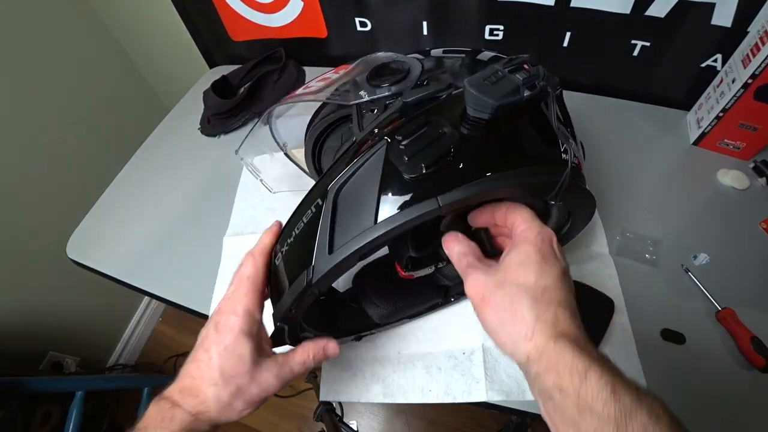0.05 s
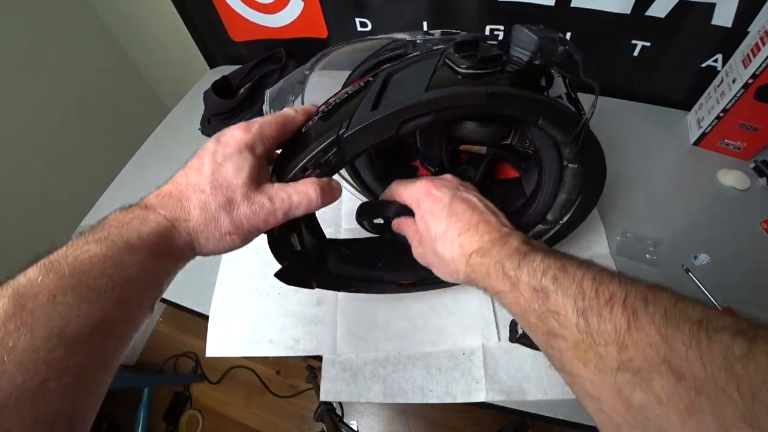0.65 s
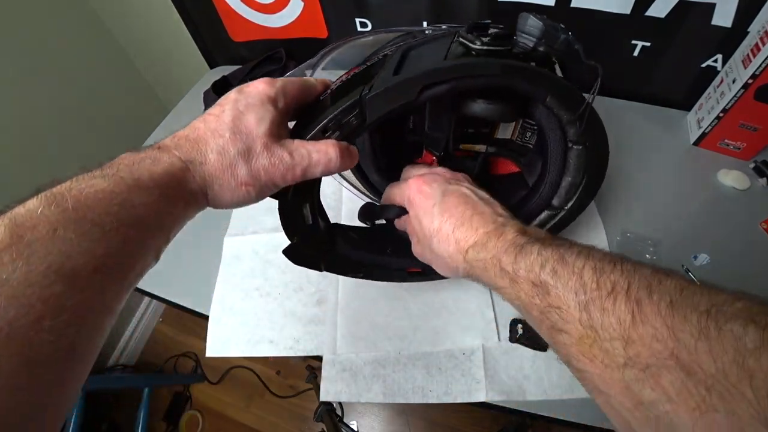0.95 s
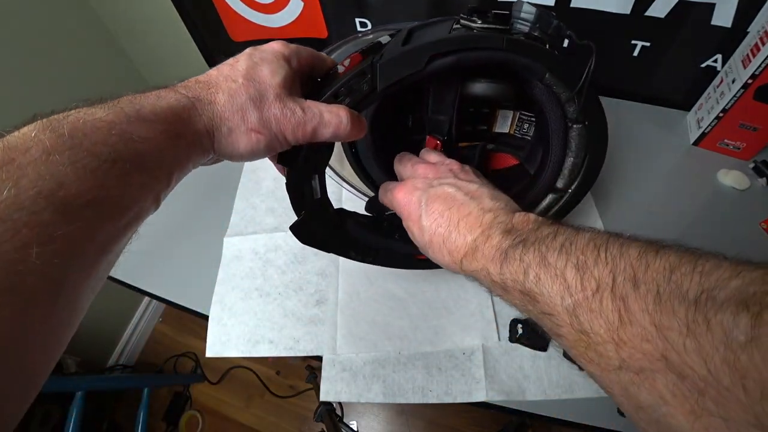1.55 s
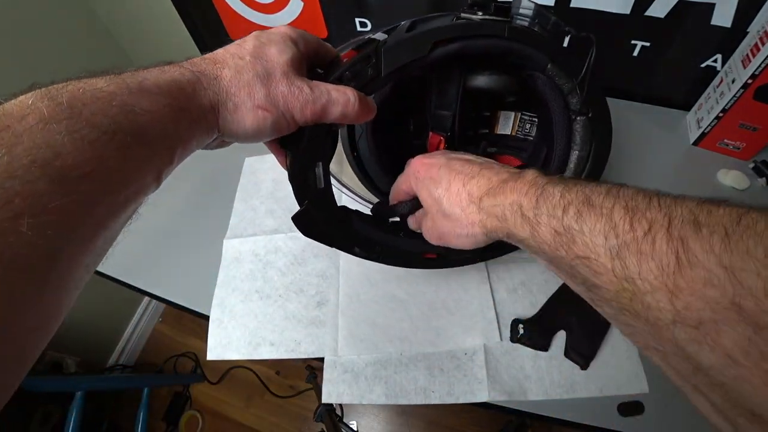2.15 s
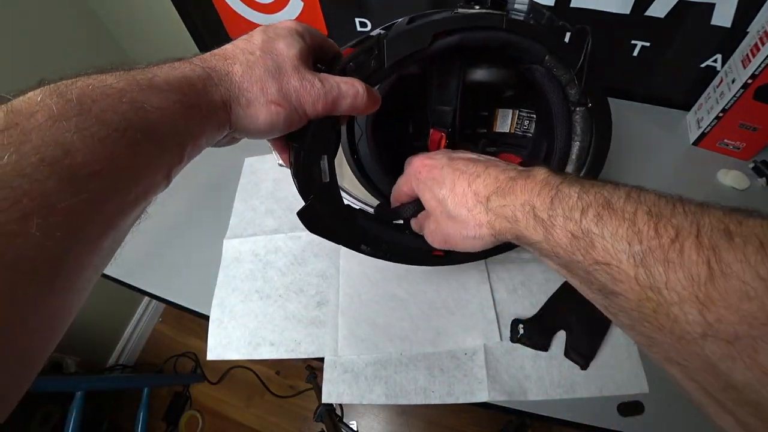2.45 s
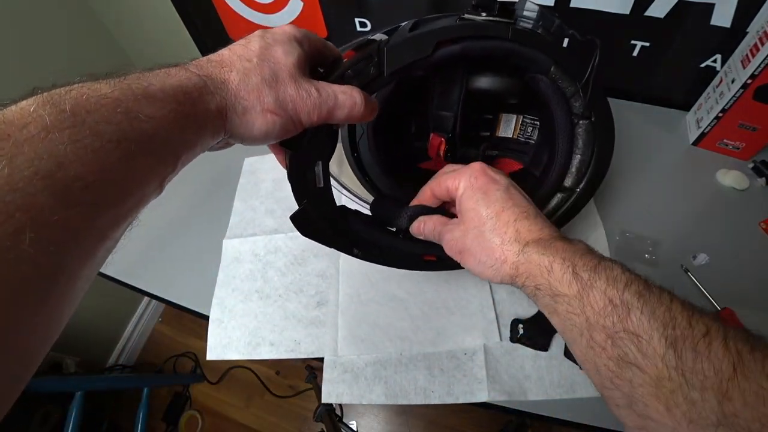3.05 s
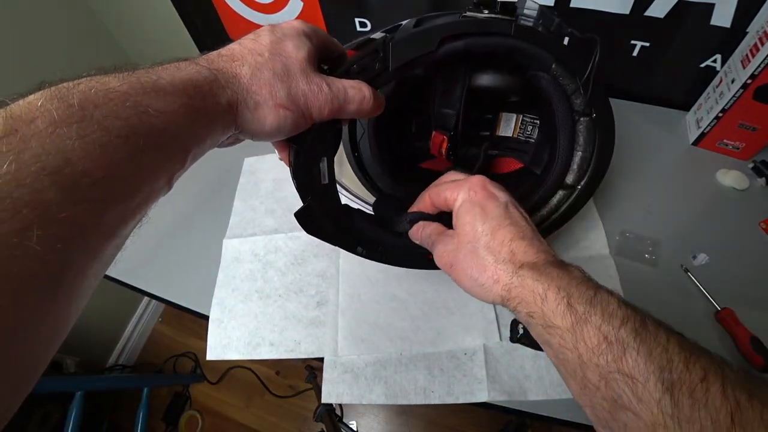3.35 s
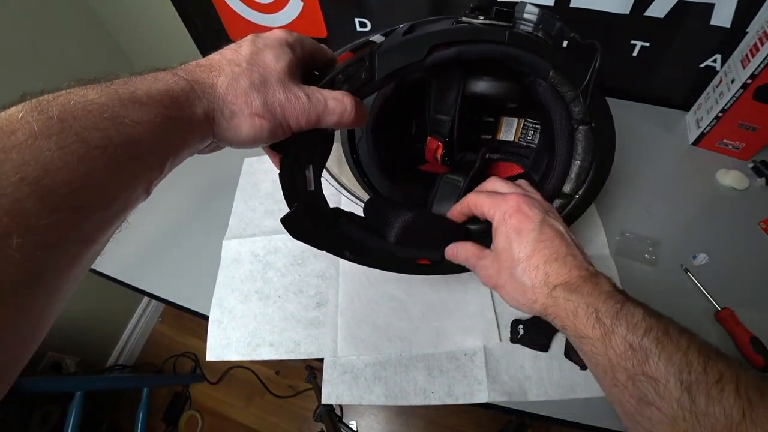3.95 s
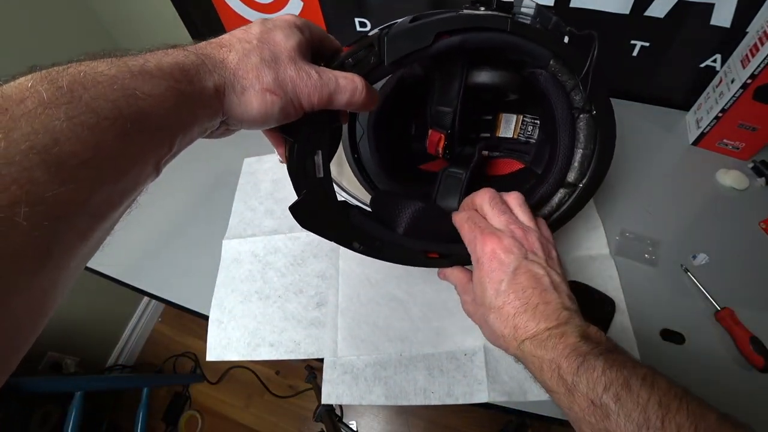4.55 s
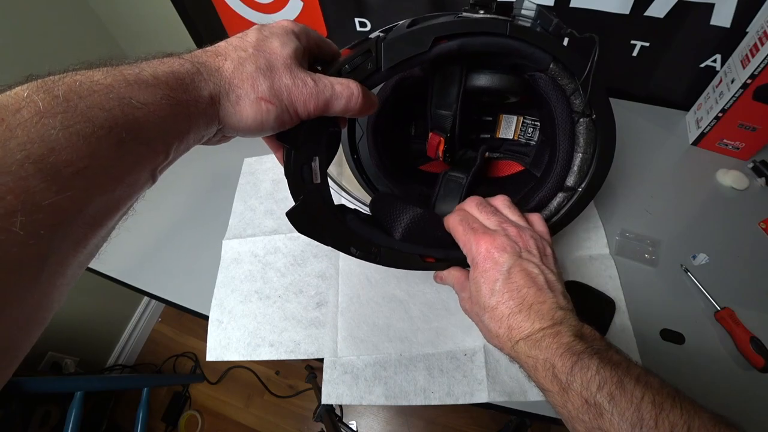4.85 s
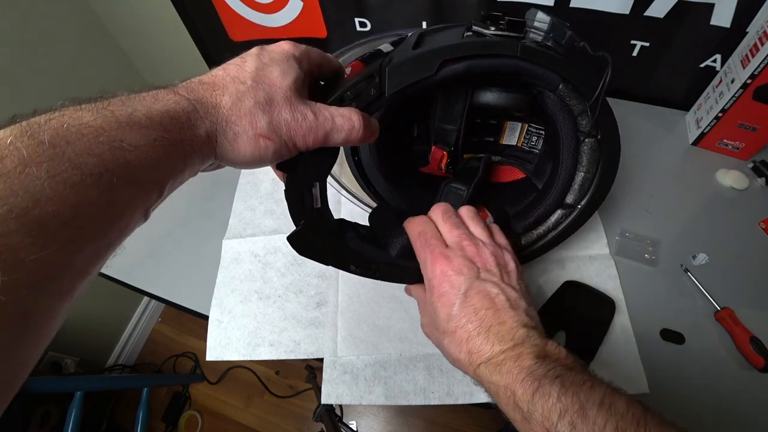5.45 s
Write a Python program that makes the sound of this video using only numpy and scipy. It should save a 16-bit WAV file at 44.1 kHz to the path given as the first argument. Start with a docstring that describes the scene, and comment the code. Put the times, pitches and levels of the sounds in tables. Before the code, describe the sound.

Fingers rub a padded fabric liner inside a helmet while plastic tabs tick lightly against the shell. From about two seconds in, press studs snap into place one at a time, each briefly ringing the hollow helmet. The padding creaks more in the second half. A last loud snap is followed by a flurry of ticks and a little rubbing. The sound is close, in a small room with a faint hum.

```python
"""A padded cheek liner is pressed into a motorcycle helmet on a table in a small room.
Over faint room noise and a low hum, fingers rub the fabric and plastic tabs tick on the shell.
From about 2 seconds, press studs snap home, ringing the hollow helmet and echoing in the room.
After 3.5 seconds the padding creaks more often, and the hum soon fades. The last stud snaps
near 5 seconds, followed by a flurry of ticks and a little more rubbing."""
import sys
import numpy as np
from scipy import signal
from scipy.fft import rfft, irfft, next_fast_len
from scipy.io import wavfile
from scipy.ndimage import uniform_filter1d, minimum_filter1d

SR = 44100
rng = np.random.default_rng(int(sys.argv[2]) if len(sys.argv) > 2 else 0)


def wav_record(signal):
    """Record a signal, one row per channel, as 16-bit PCM in the file named by sys.argv[1]."""
    frames = np.transpose(np.atleast_2d(signal))
    bounded = np.clip(frames, -1, 1)
    # unit amplitude maps onto the largest positive 16-bit level
    quanta = np.round(bounded * 32767).astype(np.int16)
    wavfile.write(sys.argv[1], SR, quanta)


N = 251237

# Press studs. Each row: start in seconds, level in dB, ring in Hz, then low, middle and top tone
# in dB against 4 kHz, chatter time in seconds, level sent to the room in dB, shell push in dB.
STUDS = [(1.973, -24.5, 4300, 1.5, 0.5, -17, 0.015, -9.5, -37),
         (2.4242, -9.5, 5350, -13, -2, -15, 0.00082, -3.5, -19),
         (3.2686, -25, 6740, 4.5, 4, -1, .013, -9.5, -33),
         (3.4271, -13, 1535, -6.5, 2.5, -14.5, 0.0048, -7.5, -18),
         (4.901, -9, 3900, -7.5, -5.5, -11, 0.0038, -0.5, -31)]


def undb(db):
    """Turn decibels into a gain."""
    return 10 ** (np.asarray(db) / 20)


def unit(x):
    """Scale a sound to an average power of 1."""
    return x / np.sqrt(np.mean(x ** 2))


def burst(x):
    """Give a short sound the energy of 5 ms at power 1."""
    return x / np.linalg.norm(x) * np.sqrt(.005 * SR)


def over_hz(points, hz):
    """Read between (Hz, value) points, with octaves evenly spaced."""
    f, value = np.transpose(points)
    return np.interp(np.log(np.maximum(hz, 1)), np.log(f), value)


def over_time(points):
    """Join (seconds, value) points into one value per sample."""
    return np.interp(np.arange(N) / SR, *np.transpose(points))


def colour(x, points):
    """Shape a sound's tone with (Hz, dB) points."""
    n = x.shape[-1]
    size = next_fast_len(n)
    gain = undb(over_hz(points, np.fft.rfftfreq(size, 1 / SR)))
    return irfft(rfft(x, size) * gain, size)[..., :n]


def causal(gain):
    """The quickest response to a tap that has these gains across frequency."""
    cepstrum = irfft(np.log(gain + 1e-9))
    half = len(cepstrum) // 2
    cepstrum[1:half] *= 2
    cepstrum[half + 1:] = 0
    return irfft(np.exp(rfft(cepstrum)))


def add(track, s, sound):
    """Mix a sound in at s seconds."""
    start = max(int(s * SR), 0)
    track[start:start + len(sound)] += sound[:max(N - start, 0)]


def stereo(mid, side):
    """Make left and right from what they share (mid) and how they differ (side)."""
    return np.array([mid + side, mid - side])


def background(air_db=-65.5, hum_hz=121):
    """Steady room noise, alike on both sides in the bass, and a low hum that fades."""
    # Tone of the room noise. Each row: frequency in Hz, level in dB.
    air_tone = [(25, -32), (65, -8.5), (130, 1), (250, 7), (450, 8), (1500, 3.5), (2500, -3), (6500, -6.5),
                (9000, -5.5), (11500, -11.5), (13000, -48)]
    # Strength of the hum. Each row: time in seconds, level in dB.
    hum_levels = [(0, -82.5), (3.8, -79.5), (4.2, -96), (5.7, -112)]
    mid, side = (unit(colour(rng.standard_normal(N), air_tone)) for _ in range(2))
    side = colour(side, [(100, -9), (350, -2.5), (900, 7), (2500, 8), (7000, -0.5)])
    hum = np.sqrt(2) * np.sin(2 * np.pi * hum_hz * np.arange(N) / SR) * undb(over_time(hum_levels))
    return undb(air_db) * stereo(mid, side) + hum


def room(x, build_s=0.0015, side_db=-6, early_db=8, early_s=0.012, alike_hz=220):
    """The table and near walls echo within milliseconds; the tail dies first in the treble."""
    # Tone of the echo. Each row: frequency in Hz, gain in dB.
    echo_tone = [(50, -19), (170, 5), (250, -6), (310, 3.5), (400, -1.5), (620, 3.5), (950, 1), (1500, 0),
                 (2200, -2.5), (4500, -7.5), (6500, -7), (9000, -11.5), (11500, -9)]
    # Length of the echo. Each row: frequency in Hz, seconds to fade by 60 dB (called t60).
    fade_times = [(200, 0.38), (530, 0.38), (1400, 0.44), (3700, 0.42), (6500, 0.36), (10000, 0.31)]
    size = SR * 2 // 3
    t, hz = np.arange(size) / SR, np.fft.rfftfreq(size, 1 / SR)
    noise = rfft(rng.standard_normal((2, size)))
    noise[1] *= hz / np.hypot(hz, alike_hz)  # long waves reach both sides alike
    centres, t60s = np.transpose(fade_times)
    tail = 0
    for share, t60 in zip(np.eye(len(centres)), t60s):
        gain = over_hz(list(zip(centres, share)), hz) * undb(over_hz(echo_tone, hz))
        tail = tail + irfft(noise * gain, size) * np.exp(-np.log(1000) * t / t60)
    tail = tail * (1 - np.exp(-t / build_s)) * (1 + undb(early_db) * np.exp(-t / early_s))
    mid, side = tail / np.sqrt(SR * t60s.mean() / np.log(1e6))
    return signal.fftconvolve(x[None], stereo(mid, undb(side_db) * side), axes=1)[:, :N]


def shell(x):
    """Every touch makes the hollow of the helmet ring briefly."""
    # The helmet's own notes. Each row: pitch in Hz, seconds to fade by 60 dB, gain in dB.
    notes = [(330, 0.35, -4), (387.3, 0.29, 2.5), (452, 0.3, 5), (513, 0.11, 9), (782, 0.038, 5),
             (894, 0.027, 3), (1124, 0.2, -26), (1620, 0.25, 7)]
    t = np.arange(SR // 3) / SR
    ring = 0
    for hz, t60, db in notes:
        decay = np.log(1000) / t60
        ring = ring + undb(db) * 2 * decay / SR * np.cos(2 * np.pi * hz * t) * np.exp(-decay * t)
    return signal.fftconvolve(x, ring)[:N]


def fingers(grip_pressure_db=-2, rise_share=0.25, firm_rub_per_db=0.1, patchy_db=1.5):
    """Strokes swell and fade, setting the strength of padding drag, cloth rub and fibre hiss."""
    # Resting hands never quite stop. Each row: time in seconds, level in dB.
    grip = [(0, -62.5), (.7, -65), (1.2, -68.5), (2.2, -69), (2.9, -65.5), (3.1, -70.5), (4.6, -71),
            (5.3, -67), (5.69, -73)]
    # Finger strokes. Each row: start and length in seconds, level in dB, pressure in dB.
    strokes = [(.01, 0.073, -63.5, 5), (0.088, 0.15, -54, -5.5), (.26, .13, -60.5, -4),
               (.44, 0.24, -62, -1), (.72, .14, -66, -6), (.82, 0.12, -62.5, -9), (1.03, 0.11, -60, 0.5),
               (1.17, 0.13, -71, -10), (1.29, 0.15, -59.5, -5), (1.52, .09, -61, -2.5),
               (1.688, 0.18, -58, -3.5), (1.86, 0.16, -56.5, -2), (1.99, .13, -70.5, -17.5),
               (2.25, 0.073, -62, 9.5), (2.61, 0.056, -52.5, 1), (2.7, 0.091, -58.5, 2),
               (2.852, 0.077, -61, -2), (3.51, 0.36, -58.5, 0.5), (3.7, 0.11, -60, -2),
               (3.988, .11, -52.5, -1), (4.059, 0.13, -51, 4), (4.26, .08, -60.5, -1),
               (4.33, .1, -56.5, 4.5), (4.43, 0.074, -62.5, 2.5), (4.612, .1, -61.5, 1.5),
               (4.75, 0.098, -59.5, 9.5), (4.832, .14, -53, -1), (5.06, 0.19, -59.5, 3.5),
               (5.49, .1, -59.5, 2.5)]
    t = np.arange(N) / SR
    lean = np.array([[1], [0], [-1]])  # a firm touch drags the padding, a light one brushes the fibres
    power = undb(over_time(grip) + lean * grip_pressure_db) ** 2
    for s, length, db, pressure_db in strokes:
        speed = np.interp(t, [s, s + rise_share * length, s + length], [0, 1, 0])
        extra_rub_db = firm_rub_per_db * max(pressure_db, 0) * (lean == 0)
        power += speed * undb(db + lean * pressure_db + extra_rub_db) ** 2
    catches = t[::1024]  # the cloth catches and lets go unevenly
    return np.sqrt(power) * undb(patchy_db * np.interp(t, catches, rng.standard_normal(len(catches))))


def friction(tone, per_second, spread_db, hiss_db):
    """Tiny slips of very uneven size over the smooth hiss of sliding cloth."""
    spikes = (rng.random(N) < per_second / SR) * rng.choice([-1, 1], N)
    sizes = undb(spread_db * np.minimum(rng.exponential(size=N), 4))
    hiss = undb(hiss_db) * rng.standard_normal(N)
    return unit(colour(unit(spikes * sizes) + hiss, tone))


def liner(dragging, rubbing, brushing, drag_db=-1, cloth_db=-2):
    """Padding drags on the shell while the cloth cover rubs and its fibres crackle."""
    # Tones of padding, cloth and fibres. Each row: frequency in Hz, level in dB.
    drag_tone = [(40, -38), (150, -25.5), (250, -13), (360, 0), (600, -8), (950, -0.5), (1600, 0),
                 (2300, -7), (4500, -25)]
    cloth_tone = [(800, -21.5), (1900, -14), (2800, 4.5), (4500, 1.5), (6000, -4.5), (9000, -11)]
    fibre_tone = [(3000, -22), (5500, -2.5), (6800, -2.5), (8500, -7), (11000, -7.5)]
    drag = friction(drag_tone, per_second=450, spread_db=3.5, hiss_db=-3)
    cloth = friction(cloth_tone, per_second=1200, spread_db=3.5, hiss_db=-1)
    fibre = friction(fibre_tone, per_second=900, spread_db=4.5, hiss_db=-1)
    return drag * dragging * undb(drag_db) + cloth * rubbing * undb(cloth_db) + fibre * brushing


def slips(count=6, gap_s=0.011, doubling_db=22, gap_scatter=.05, pitch_scatter=0.085):
    """Padding sticks and slips until the push is spent: lists each slip's time, gain, pitch and grit."""
    # Creaks. Each row: start and length in seconds, level in dB, pitch in Hz, grit in dB.
    runs = [(0.108, .004, -39.5, 740, 9), (0.516, .004, -43, 946, -22), (1.7441, .004, -37, 1450, -25),
            (2.117, .004, -42, 1547, -20), (3.6108, .003, -28, 1024, -1.5), (3.6214, .003, -27.5, 1560, 3),
            (3.6265, .003, -29.5, 448, -9), (3.6285, .003, -24, 1730, -2), (3.6322, 0.017, -31.5, 814, -6),
            (4.0743, 0.025, -40, 1060, -4), (4.1194, .004, -34.5, 1020, -2),
            (4.1251, 0.0093, -31.5, 1060, 8), (4.1285, .004, -28.5, 1267, 2.5),
            (4.209, 0.021, -47.5, 1080, -2), (4.308, 0.0036, -43.5, 1050, 3),
            (4.3486, 0.032, -42, 960, -14), (4.7577, 0.031, -44.5, 926, -27), (4.816, .004, -35, 550, 5),
            (4.904, 0.023, -29.5, 880, -22), (4.963, 0.06, -38, 930, -10), (5.634, 0.0057, -52, 530, 0.5)]
    scatter = rng.standard_normal((len(runs), 2, count))
    rows = []
    for (s, length, db, hz, grit_db), (late, detune) in zip(runs, scatter):
        gaps = gap_s * 2 ** (-(db + 40) / doubling_db)  # a harder push slips more often
        gaps = gaps * np.exp(gap_scatter * late)
        ages = np.cumsum(gaps) - gaps[0]
        gains = undb(db) * np.exp(-(ages / length) ** 4)
        pitches = hz * np.exp(pitch_scatter * detune * (ages > 0))
        rows += [(s + age, gain, pitch, grit_db) for age, gain, pitch in zip(ages, gains, pitches)]
    return rows


def creaks(swell_s=0.0016, overtone=2.2, overtone_db=-11, size=1024):
    """Each slip of the foam swings for a few cycles, with grit from the cloth; a run of them creaks."""
    t, out = np.arange(size) / SR, np.zeros(N)
    push = t / swell_s * np.exp(-t / swell_s)
    for s, gain, hz, grit_db in slips():
        phase = 2 * np.pi * hz * t + 2 * np.pi * rng.random()
        swing = unit(np.sin(phase) + undb(overtone_db) * np.sin(overtone * phase))
        noise = rng.standard_normal(size)
        grit = unit(colour(noise, [(200, -9.5), (700, -8), (5000, -6), (11000, -13.5)]))
        add(out, s, burst(push * (swing + undb(grit_db) * grit)) * gain)
    return colour(out, [(60, -38), (200, -15), (420, -1.5)])  # a small pad gives off little bass


def resonance(hz, ring_hz, peak_db=3.5, sharpness=15):
    """A small plastic part boosts the frequencies near its own note."""
    ratio = hz / ring_hz
    return 1 + undb(peak_db) * 1j * ratio / (sharpness * (1 - ratio ** 2) + 1j * ratio)


def click(ring_hz, low_db, mid_db, top_db, t60, chatter_db=7.5, creep_db=-3, creep_s=0.00059):
    """A plastic edge creeps, lets go with a sharp spike, then chatters briefly."""
    # Centres of the low, middle, reference and top bands in Hz.
    bands_hz = [560, 1550, 4200, 9000]
    # Tone shared by all clicks. Each row: frequency in Hz, level in dB.
    contact_tone = [(25, -10.5), (100, -29.5), (190, -19), (350, 2), (560, 0), (7000, 7), (11500, -1.5),
                    (15000, -10)]
    size, lead = 2048, 256  # samples in all, and before the spike
    t, hz = (np.arange(size) - lead) / SR, np.fft.rfftfreq(size, 1 / SR)
    noise = rng.standard_normal(size)
    chatter = noise * (t >= 0) * np.exp(-np.log(1000) * abs(t) / max(t60, 1e-3))
    creep = noise * (t < 0) * np.exp(-abs(t) / creep_s)
    spike = unit(1. * (t == 0))
    spectrum = rfft(undb(chatter_db) * unit(chatter) + undb(creep_db) * unit(creep) + spike)
    # even out the tone over 2000 Hz spans, keeping the chatter's narrow peaks
    spectrum /= np.sqrt(uniform_filter1d(abs(spectrum) ** 2, int(2000 / hz[1])))
    band_levels = list(zip(bands_hz, (low_db, mid_db, 0, top_db)))
    tone = causal(undb(over_hz(band_levels, hz) + over_hz(contact_tone, hz)))
    # bending waves are slower at low pitch, which turns the spike into a few cycles
    bending = np.exp(-2j * np.pi * 2.4 * np.sqrt(hz / 4000))
    direct = irfft(spectrum * bending * rfft(tone) * resonance(hz, ring_hz))
    # over all directions the narrow peaks even out, so the room gets only the broad tone
    return burst(direct), burst(tone), lead / SR


def tab(ring_hz, body_db, edge_db, chatter_s=.009, doubling_db=10.5):
    """A plastic tab catches on the shell; one with more body chatters longer."""
    # Large, low-ringing tabs give more bass. Each row: ring in Hz, bass in dB against the body.
    bass = [(850, 4), (1500, -9.5), (2200, -10), (6000, -10)]
    low_db = body_db + over_hz(bass, ring_hz)
    t60 = chatter_s * 2 ** (body_db / doubling_db)
    return click(ring_hz, low_db, body_db, edge_db, t60, chatter_db=1, creep_db=-13.5, creep_s=0.00078)


def stud_pushes(push_s=0.00063, lag_s=0.00073):
    """The shell springs back just after each stud seats: a soft push that reaches only its low notes."""
    t, out = np.arange(512) / SR, np.zeros(N)
    for s, *_, push_db in STUDS:
        add(out, s + lag_s, burst(t * np.exp(-t / push_s)) * undb(push_db))
    # the stiff shell hardly follows slower pushes
    return colour(out, [(120, -6), (280, -4), (400, 3.5), (700, -16.5)])


def studs_and_tabs(spots=5, tab_send_db=-7, send_per_body_db=0.14):
    """Studs snap and tabs tick: the direct sound, and what each spot on the shell sends to the room."""
    # Tab ticks. Each row: start in seconds, level in dB, ring in Hz, then body (middle tone)
    # and edge (top tone) in dB against 4 kHz.
    ticks = [(.1125, -40, 804, 18, -5), (0.14, -39, 6900, 9, 4), (0.2749, -50, 845, -1, -26),
             (0.4432, -48.5, 940, 4, -11), (0.501, -46, 1330, 13, -4), (0.516, -41.5, 860, 2, -2.5),
             (0.7932, -50, 686, 4, -9), (0.854, -51.5, 7060, -8, 11), (0.8838, -45, 5100, 3, -3),
             (0.9001, -41.5, 4200, -1, 7), (0.9053, -44.5, 9400, -10, -6), (0.9966, -52.5, 6140, 2, 8),
             (1.032, -51, 10200, 2, 3), (1.1263, -48.5, 880, 4, -4), (1.2599, -38.5, 2230, 12.5, -9.5),
             (1.3273, -50.5, 3640, -8, -10), (1.3422, -46.5, 10000, -4, 5), (1.3483, -41.5, 5740, 3, 10),
             (1.3617, -32.5, 2200, 9, -9), (1.3856, -43.5, 6400, 0, 17), (1.416, -50, 10100, -4, 16),
             (1.466, -36, 5840, -0.5, 3.5), (1.5183, -40.5, 1890, 2.5, 3.5), (1.5696, -39, 6570, 7, 10.5),
             (1.6197, -50, 4680, -12, -15), (1.7438, -38.5, 1560, 8.5, -3.5), (1.7762, -45.5, 6220, 4, 4),
             (1.7941, -43.5, 3870, 5, 3.5), (1.866, -47.5, 6350, 2, 8), (1.8905, -47, 4130, -2, -13),
             (1.956, -33, 1530, 6.5, -10), (2.0063, -43, 775, 7, -4), (2.0139, -38.5, 8150, -3, 0),
             (2.119, -42, 1480, 16.5, -4), (2.1531, -33, 3220, 2.5, -0.5), (2.2556, -38, 1390, 8, -1.5),
             (2.3754, -43, 1440, 13, -4), (2.6455, -42.5, 1490, 3, -10), (2.674, -44.5, 1620, 5, -3),
             (2.738, -47, 1270, 5, 9), (2.8409, -38.5, 2160, 6.5, -9.5), (2.86, -47, 2100, 9, -4),
             (2.9329, -37.5, 1390, 5, -8.5), (3.0697, -57, 9690, -12, 8), (3.0788, -39, 5800, 11.5, -0.5),
             (3.1995, -59, 6840, -12, 17), (3.3739, -51, 6220, -12, 10), (3.5211, -34, 4360, 5, -1),
             (3.576, -37, 1820, 1, -13), (3.5927, -28.5, 1610, 9, -10), (3.6256, -23, 1850, 17.5, 9),
             (3.7177, -42.5, 1500, 1, 1), (3.868, -35, 3150, 4, -6.5), (4.3217, -27.5, 4970, 5.5, 4.5),
             (4.3591, -35, 1880, 7, -1), (4.3799, -36.5, 2030, 8, -6), (4.3984, -41.5, 3100, 4, -19),
             (4.4125, -46, 1060, 4, -8), (4.4852, -49.5, 2490, 10, -1), (4.5564, -45, 7060, -7, -10),
             (4.5616, -29.5, 7060, -1.5, 5.5), (4.5888, -31, 5600, -7, -7), (4.8297, -28.5, 6340, 3.5, 5.5),
             (4.8329, -29.5, 6220, -3.5, -22), (4.8535, -33, 6420, -11, -2), (4.874, -35, 6420, -13, 1),
             (4.885, -42, 6220, -7.5, 2), (5.0232, -47, 2650, -9, -1), (5.0648, -33, 6000, -18, -4),
             (5.075, -29.5, 3750, -1, 2), (5.085, -32, 6030, -8, -10), (5.093, -24.5, 6900, -11, 38),
             (5.1, -20, 7500, -10.5, -5.5), (5.1157, -31.5, 6220, -14, 1), (5.1472, -29.5, 6500, -6.5, 0),
             (5.1814, -32.5, 7200, -34.5, -8.5), (5.3576, -50, 1360, 4, -10), (5.495, -44, 4740, -8, 1),
             (5.508, -42, 1060, 14, -10), (5.5235, -44, 6060, 0, 3)]
    hits = [(s, db, send_db, click(*tone)) for s, db, *tone, send_db, _ in STUDS]
    for s, db, hz, body_db, edge_db in ticks:
        send_db = tab_send_db + send_per_body_db * min(body_db, 0)  # a thin tab stirs the room less
        hits.append((s, db, send_db, tab(hz, body_db, edge_db)))
    near, sent = np.zeros(N), np.zeros((spots, N))
    for k, (s, db, send_db, (direct, to_room, lead_s)) in enumerate(hits):
        add(near, s - lead_s, direct * undb(db))
        add(sent[k % spots], s, to_room * undb(db + send_db))
    return near, sent


def limiter(x, ceiling_db=-3.5, release_db_per_s=134, smooth_samples=45):
    """Peaks over the ceiling pull the volume down at once; it then climbs back steadily."""
    over = np.maximum(20 * np.log10(abs(x).max(axis=0) + 1e-9) - ceiling_db, 0)
    climb = release_db_per_s * np.arange(N) / SR
    gain_db = climb - np.maximum.accumulate(over + climb)
    return x * undb(uniform_filter1d(minimum_filter1d(gain_db, smooth_samples), smooth_samples))


def scene(rub_send_db=-7, creak_send_db=-12, click_ring_db=-6, rub_ring_db=-9, creak_ring_db=-7):
    """The hands work just right of the listener; each spot on the helmet has its own echo."""
    dragging, rubbing, brushing = fingers()
    clicks, sent = studs_and_tabs()
    rub, creak = liner(dragging, rubbing, brushing), creaks()
    near = clicks + rub + creak
    rightward = colour(near, [(800, -39), (2000, -17.5), (4000, -17.5), (10000, -17)])  # mostly treble
    touches = undb(click_ring_db) * clicks + undb(rub_ring_db) * rub + undb(creak_ring_db) * creak
    hollow = shell(stud_pushes() + touches)
    echoes = sum(room(spot) for spot in sent)
    echoes += room(undb(rub_send_db) * rub + undb(creak_send_db) * creak)
    return stereo(near, -rightward) + hollow + echoes + background()


def record(dry):
    """Hold down the loudest snaps and cut the top octave."""
    low_pass = signal.ellip(8, .05, 42, 11040, fs=SR, output="sos")
    return signal.sosfiltfilt(low_pass, limiter(dry))


dry = scene()
out = record(dry)
wav_record(out)
```